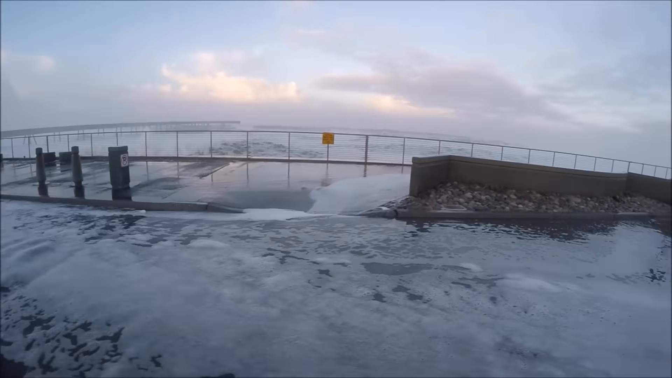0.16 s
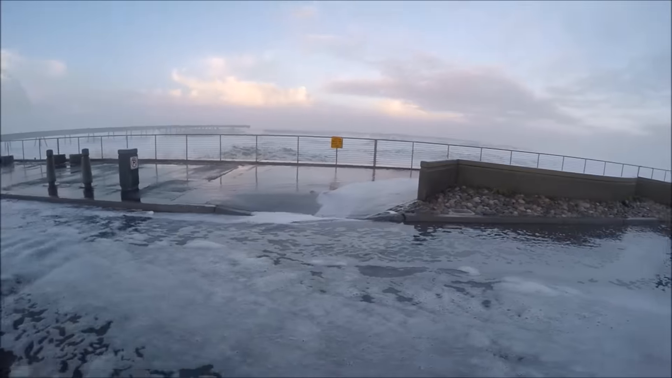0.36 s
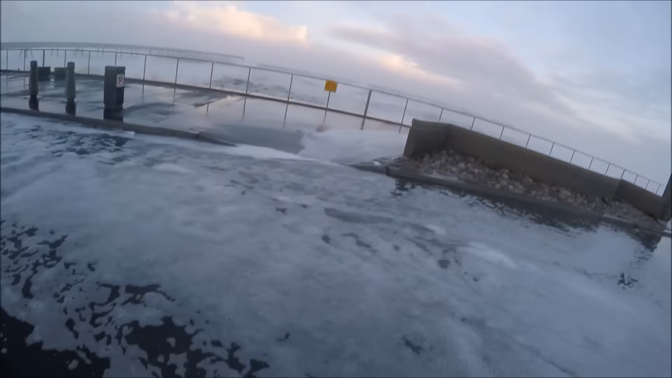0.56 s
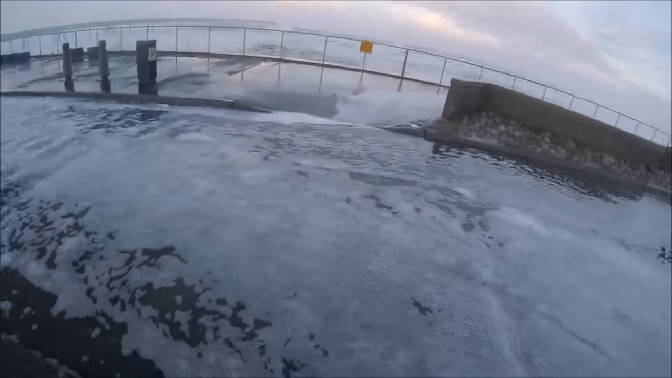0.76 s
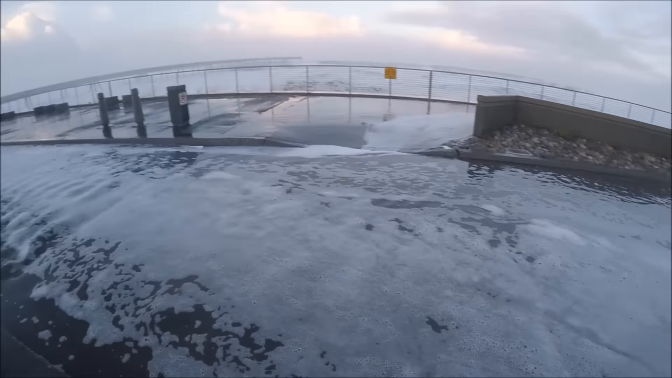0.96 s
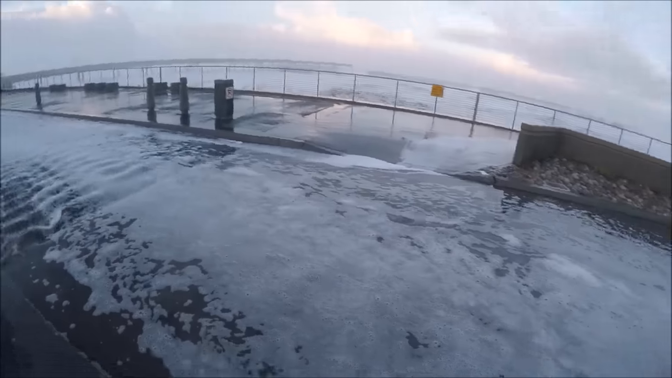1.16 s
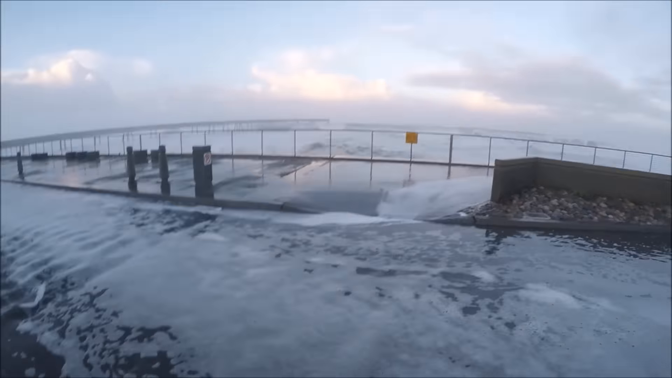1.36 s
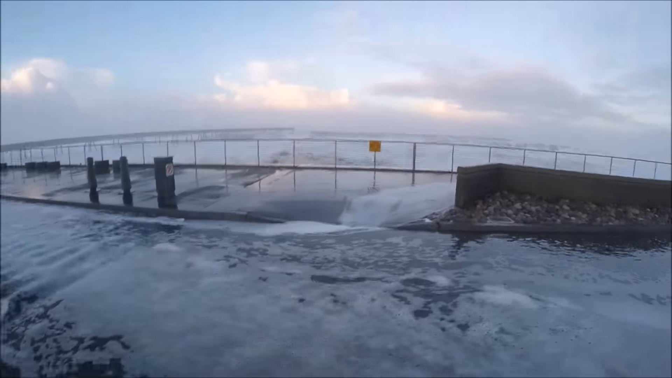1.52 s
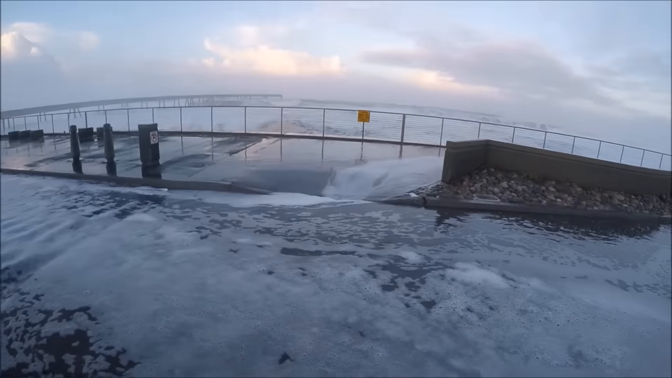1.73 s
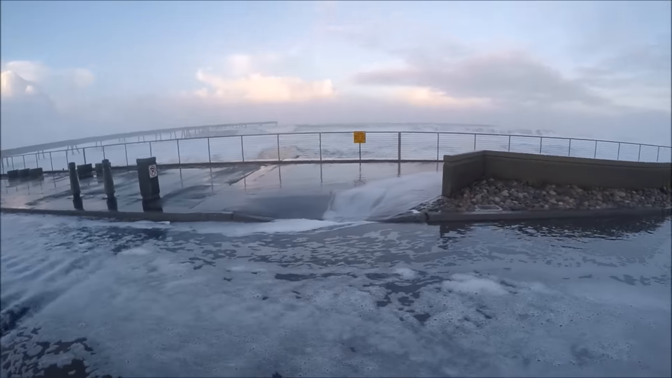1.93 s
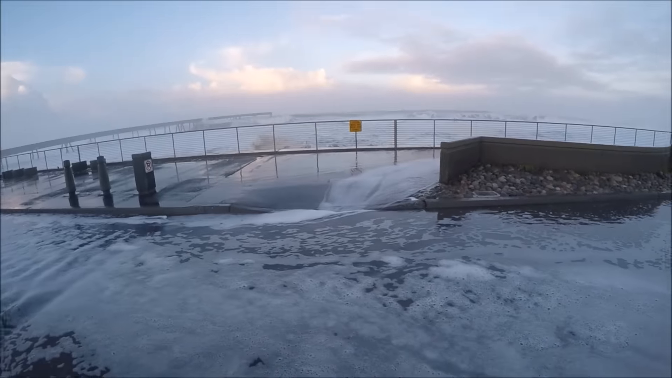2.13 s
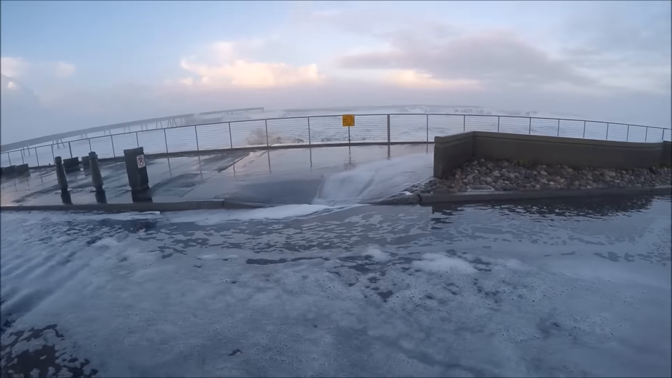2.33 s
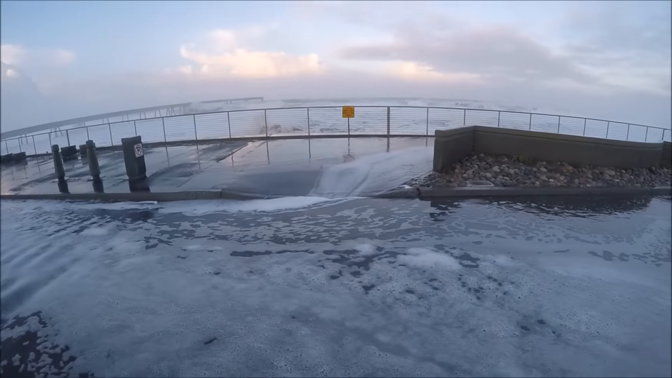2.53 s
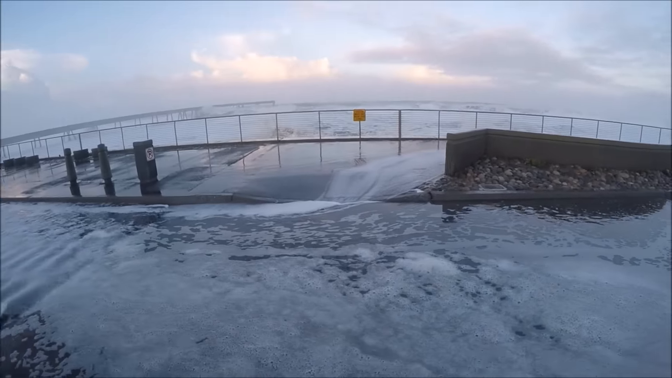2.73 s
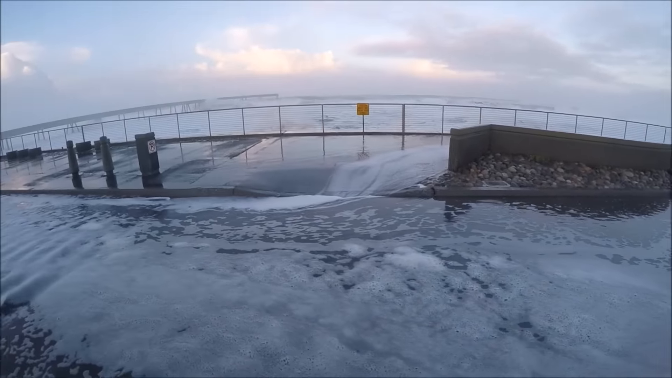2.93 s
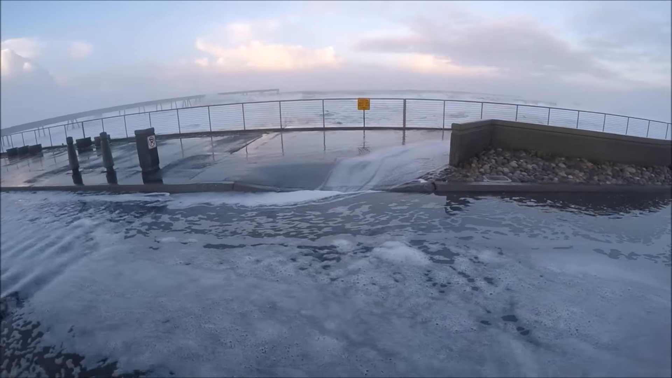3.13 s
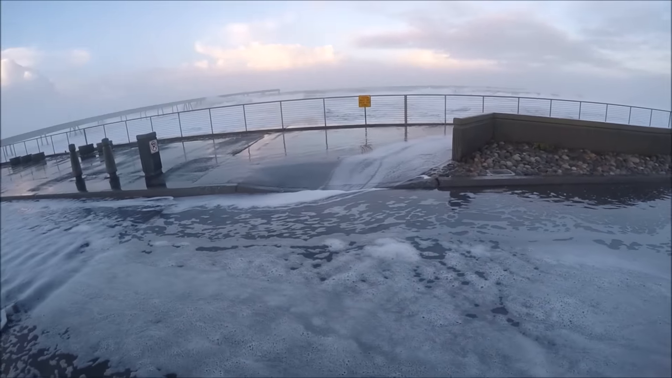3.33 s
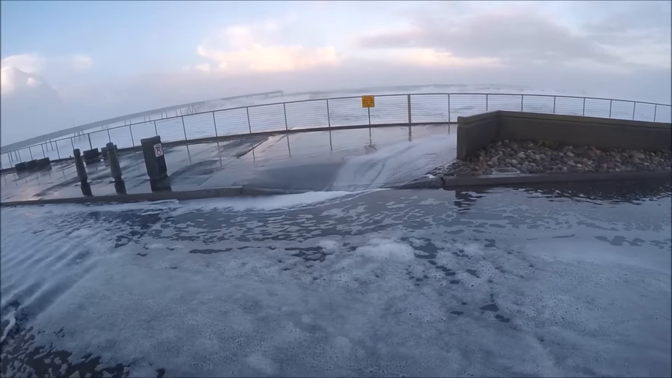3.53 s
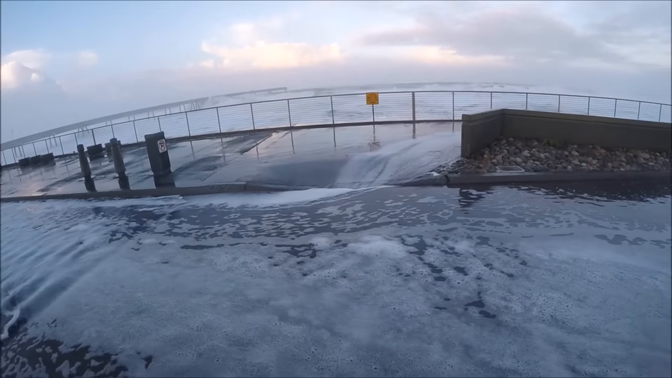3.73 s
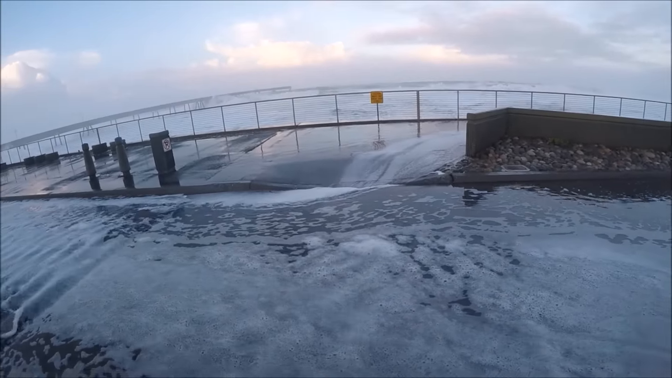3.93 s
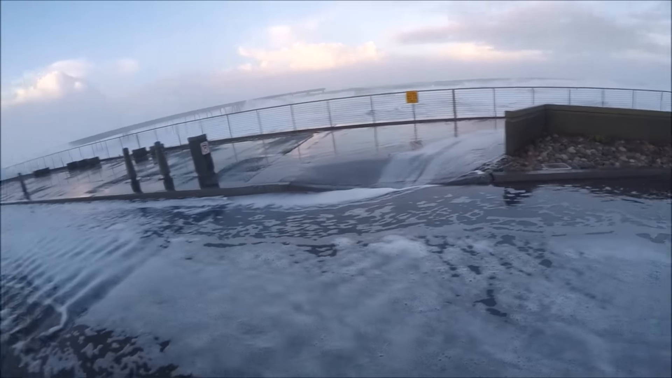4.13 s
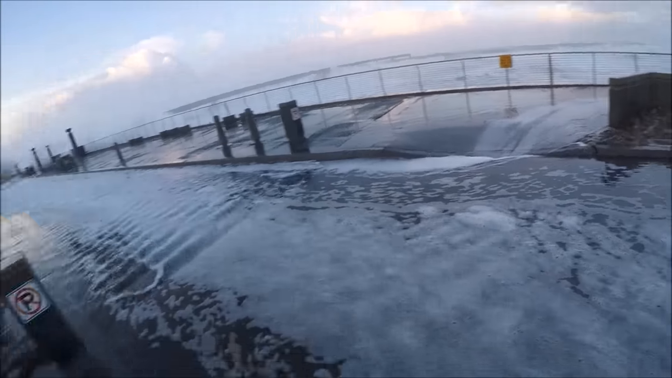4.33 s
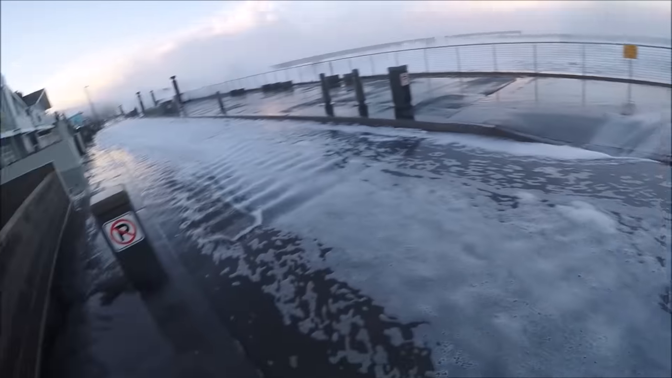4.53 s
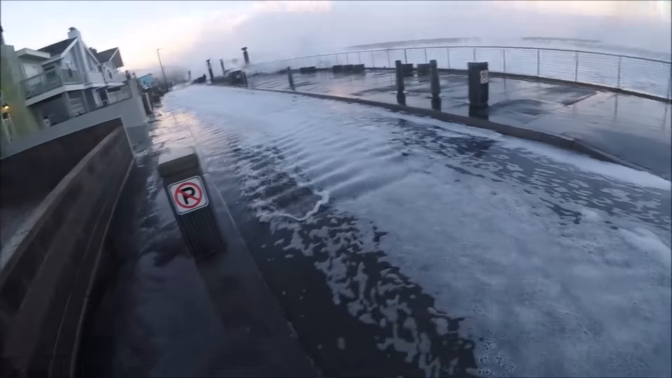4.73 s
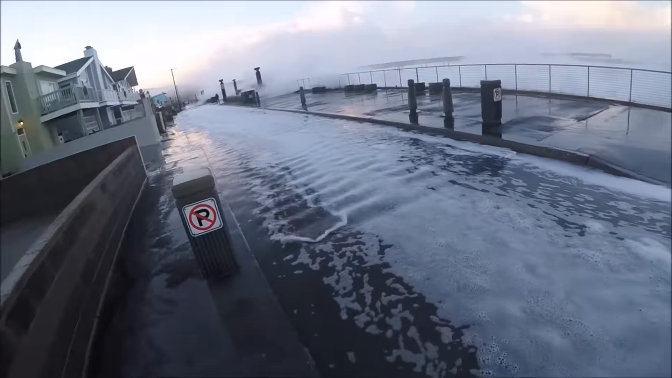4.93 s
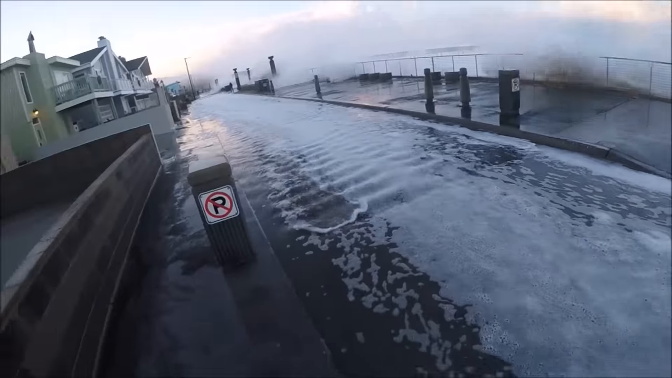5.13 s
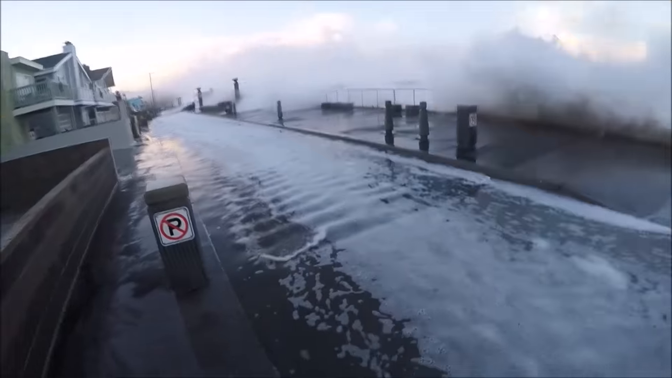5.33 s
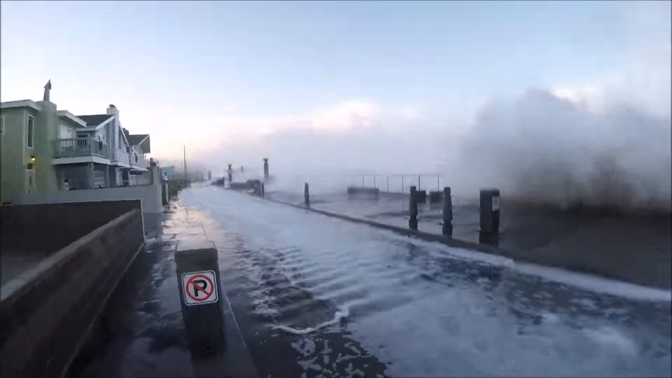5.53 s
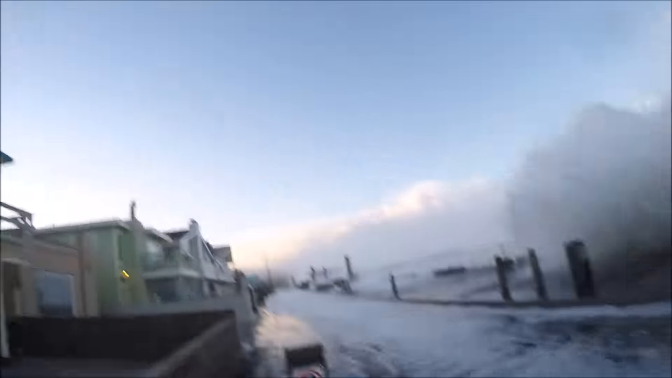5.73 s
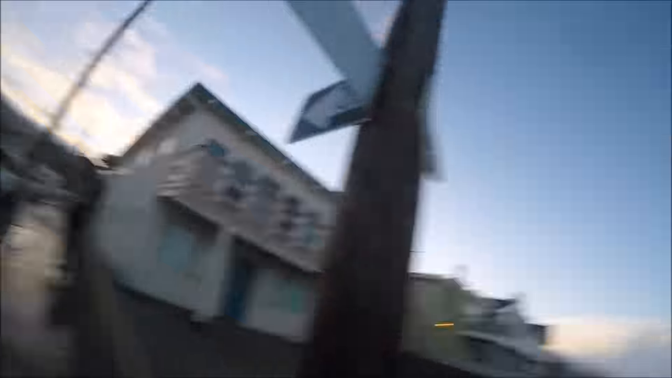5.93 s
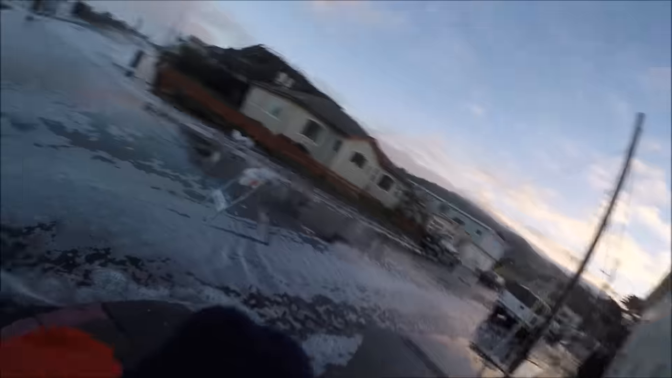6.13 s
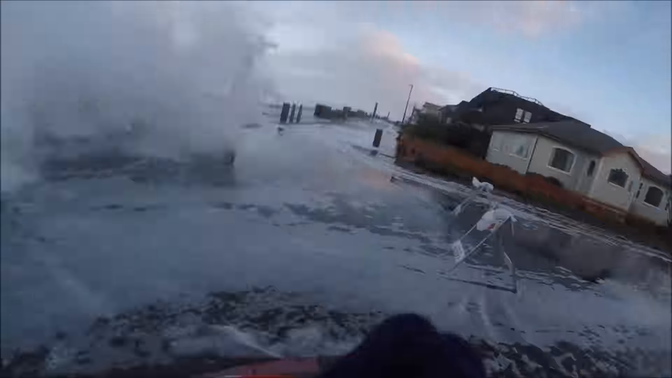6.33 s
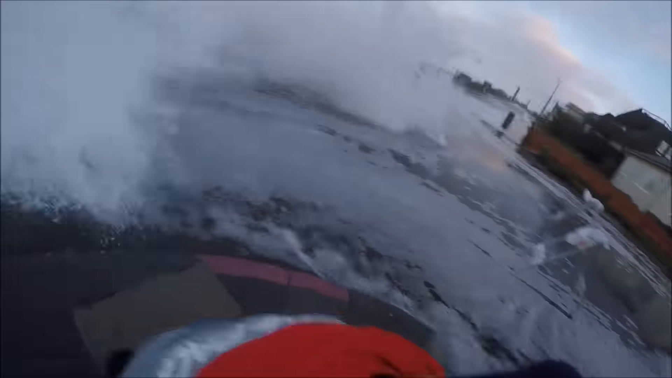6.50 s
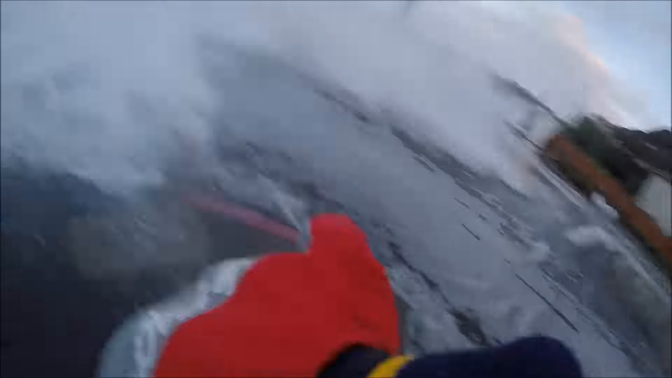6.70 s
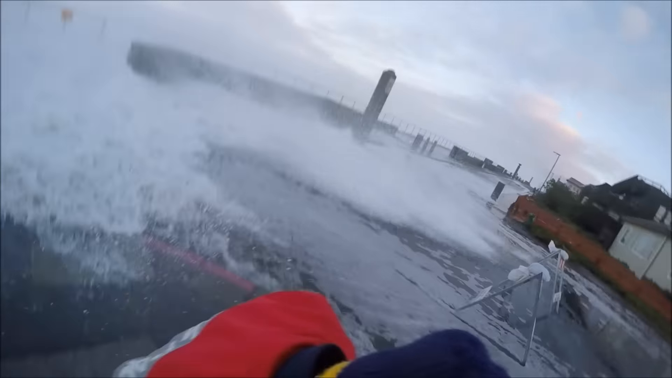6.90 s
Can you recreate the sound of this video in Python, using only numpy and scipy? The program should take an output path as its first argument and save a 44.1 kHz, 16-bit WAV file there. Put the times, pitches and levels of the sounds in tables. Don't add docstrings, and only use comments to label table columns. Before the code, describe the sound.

Gloved hands knock and rub a small plastic camera case over faint surf hiss, then thumps return as bright spray rushes in close.

```python
import sys
import numpy as np
from scipy import signal
from scipy.fft import rfft, irfft
from scipy.io import wavfile
from scipy.ndimage import uniform_filter1d

SR = 44100
rng = np.random.default_rng(int(sys.argv[2]) if len(sys.argv) > 2 else 0)


def digitize_waveform(pressure):
    field = np.atleast_2d(pressure).T
    bounded = np.clip(field, -1, 1)
    quanta = np.round(bounded * 32767).astype(np.int16)
    wavfile.write(sys.argv[1], SR, quanta)


def gain_from_db(level_db):
    decades = np.asarray(level_db, float) / 20
    return 10 ** decades


N = 306932


def rms_one(x):
    return x / np.sqrt(np.mean(x ** 2) + 1e-20)


def in_time(rows):
    s, control = np.transpose(rows)
    return np.interp(np.arange(N) / SR, s, control)


def band(x, low_hz, high_hz, order=2):
    return signal.sosfilt(signal.butter(order, [low_hz, high_hz], "band", fs=SR, output="sos"), x)


def above(hz, order):
    return signal.butter(order, hz, "high", fs=SR, output="sos")


def response(spectrum, modes, size=8192):
    hz = np.maximum(np.fft.rfftfreq(size, 1 / SR), 1)
    corner_hz, corner_db = np.transpose(spectrum)
    level_db = np.interp(np.log(hz), np.log(corner_hz), corner_db)
    for centre, width, db in modes:
        level_db = level_db + db / (1 + (2 * (hz - centre) / width) ** 2)
    cepstrum = irfft(np.log(gain_from_db(level_db)))
    cepstrum[1:size // 2] *= 2
    cepstrum[size // 2 + 1:] = 0
    return irfft(np.exp(rfft(cepstrum)))[:size // 2]


def through(x, impulse):
    return signal.fftconvolve(x, impulse)[:N]


def drift(rate_hz):
    r = np.exp(-80 * np.pi * rate_hz / SR)
    noise = rng.standard_normal(N // 40 + 2002)
    slow = signal.lfilter([1], [1, -2 * r, r * r], noise)[2000:]
    return np.interp(np.arange(N) / 40, np.arange(len(slow)), rms_one(slow))


def grains(per_s, spread_db):
    sizes = gain_from_db(spread_db * np.minimum(rng.exponential(1, N), 4)) * rng.choice([-1, 1], N)
    return sizes * (rng.random(N) < per_s / SR)


# t/s, spray level/dB
WAVE = [(0.0, -73), (4.45, -71), (4.62, -64.5), (4.67, -62.5), (5.05, -59.5), (5.08, -53), (5.2, -51.5),
        (5.28, -50), (5.31, -46.5), (5.45, -48.5), (5.6, -55.5), (5.85, -54.5), (6.04, -48.5), (6.2, -43),
        (6.33, -43), (6.6, -40), (6.8, -41.5), (6.96, -44.5)]
# f/Hz, level/dB (per Hz)
LEAK = [(410, -28), (700, -8.5), (1470, -7), (1710, -2), (2460, -3.5), (3230, -4), (3730, -18), (5500, -13),
        (7600, -26), (13100, -15), (15500, -18)]
# f/Hz, width/Hz, level/dB
CAVITY_MODES = [(1726, 190, 4), (2350, 360, 0.5), (2820, 460, 2), (3300, 360, 3), (5440, 180, 4),
                (6640, 270, 7.5), (7400, 530, 1.5), (8400, 1700, 3), (10000, 320, 4.5)]
# f/Hz, level/dB (per Hz)
ROAR = [(120, -42), (200, -3), (426, -8), (511, -10), (1200, -23), (1560, -54), (2640, -120)]
# f/Hz, level/dB (per Hz)
SPRAY = [(880, -40.5), (1500, -15.5), (2150, -6.5), (3250, -1), (3650, -5.5), (4480, -6), (8050, -23.5),
         (10200, -19.5), (15500, -29)]


def sea():
    spray_db = in_time(WAVE)
    rise_db = spray_db + 73
    surf_db = -61 + 0.64 * rise_db
    roar_db = -62.5 + 0.45 * rise_db

    surf = through(rng.standard_normal(N), response(LEAK, CAVITY_MODES))
    surf = surf / np.std(band(surf, 2900, 3500))
    surf = signal.sosfilt(signal.butter(2, 9000, fs=SR, output="sos"), surf)
    roar = rms_one(through(rng.standard_normal(N), response(ROAR, [])))

    fizz = grains(3000 * gain_from_db(2.2 * drift(6)), spread_db=4.5)
    bubbles = rms_one(fizz) + 2.0 * rng.standard_normal(N)
    spray = through(bubbles, response(SPRAY, CAVITY_MODES + [(7320, 820, 4.9)]))
    top = signal.sosfiltfilt(above(10800, 3), spray)
    spray = spray + top * (gain_from_db(0.9 * np.clip(spray_db + 43, -16, 4)) - 1)
    spray = spray / np.std(band(spray, 7000, 12000))

    surges, swell = gain_from_db(0.8 * drift(12)), gain_from_db(1.2 * drift(6))
    far_surf = gain_from_db(surf_db - 5.0 + 1.9 * drift(5.1)) * surf
    return far_surf + gain_from_db(spray_db - 3.0) * surges * spray + gain_from_db(roar_db) * swell * roar


# t/s, level/dB
WIND = [(0.0, -32), (0.24, -40.5), (0.7, -24.5), (0.85, -37), (1.63, -33.5), (1.75, -36), (2.5, -46.5),
        (3.65, -44.5), (4.2, -37), (4.42, -39.5), (4.8, -34.5), (5.18, -39), (5.6, -19.5), (5.76, -32.5),
        (5.99, -16.5), (6.3, -22.5), (6.8, -15.5), (6.96, -22.5)]
# f/Hz, level/dB (per Hz)
GUST = [(8.8, -35), (15, 2), (49, -9), (68, -4.5), (97, -24), (133, -17), (171, -24), (260, -36),
        (340, -61), (570, -120)]
# calm level/dB, share of the gust swing, hand shaking relative to the stroke level/dB
WIND_LAYERS = [
    (-43, 1, -16),
    (-45.5, 0.647, -1.5),
    (-56, 0.41, -6.5),
]


def wind(stroke_db):
    air = through(rng.standard_normal(N), response(GUST, [], size=32768))
    gust_db = in_time(WIND) + 45
    shaking = np.abs(uniform_filter1d(gain_from_db(stroke_db) ** 2, round(0.05 * SR)))
    out = np.zeros(N)
    lows_hz, highs_hz, lumps_db = (12, 45, 100), (45, 100, 240), (0.6, 2.5, 2.2)
    for (calm_db, share, hand_db), low, high, lumps in zip(WIND_LAYERS, lows_hz, highs_hz, lumps_db):
        swing = band(air, low, high, order=3)
        even = swing / np.sqrt(uniform_filter1d(swing ** 2, size=4410) + 0.073 * np.mean(swing ** 2))
        level = np.sqrt(gain_from_db(calm_db + share * gust_db) ** 2 + gain_from_db(hand_db) ** 2 * shaking)
        out += level * gain_from_db(lumps * drift(8.4)) * rms_one(even)
    return out


# f/Hz, level/dB (per Hz)
SHELL = [(150, -54), (260, -27), (430, -17), (560, -10), (1000, -12), (1500, -13.5), (2300, -3),
         (3000, -9.5), (4500, -17.5), (6200, -32.5), (9000, -35.5), (15500, -36)]
# f/Hz, width/Hz, level/dB
SHELL_MODES = [(619.5, 115, 7.5), (1200, 650, 12), (1690, 88, 2.5), (2144, 100, 6.5), (2516, 220, 10),
               (3490, 61, 11), (4010, 200, -4), (4343, 410, 12.5), (5000, 310, -19.5), (5310, 1900, 20),
               (7130, 900, 12.5), (8060, 180, -12), (8200, 380, 8), (10600, 2700, 10.5)]


def shell_bands():
    wall = response(SHELL, SHELL_MODES)
    edges_hz = (150, 1600, 3200, 18000)
    return [band(band(wall, low, high), low, high) for low, high in zip(edges_hz, edges_hz[1:])]


# t/s, peak level/dB, middle part/dB, bright part/dB (both relative), 60 dB fade/s
KNOCKS = [(0.001, -38, -8, -2.5, 0.026), (0.262, -17.5, 9, -9, 0.049), (0.374, -23, 17.5, -3, 0.079),
          (0.441, -24, -19, -11, 0.076), (0.498, -5.5, -2, -16, 0.027), (0.563, -6, 7, 1.5, 0.031),
          (0.588, -6, -15, -1, 0.021), (0.748, -20, 5, -23, 0.028), (1.097, -1.5, -3, -13, 0.015),
          (1.114, -20.5, -21, 6.5, 0.028), (1.428, -11.5, -5, -8.5, 0.018), (1.574, -41, -10, -21, 0.027),
          (1.816, -28.5, 1, -9.5, 0.031), (1.835, -19, -16, -26, 0.016), (2.554, -54, 12, 12, 0.03),
          (4.327, -33, 0, -16, 0.029), (4.784, -39.5, -17, 0, 0.038), (5.517, -28, -12, -18, 0.1),
          (5.984, -20.5, -1, -9, 0.1), (6.218, -9.5, -25, -9, 0.071), (6.497, -23.5, -13, -13, 0.1)]


def knocks(parts):
    out, t = np.zeros(N), np.arange(4096) / SR
    rattles = rng.standard_normal((len(KNOCKS), len(t)))
    for (s, db, middle_db, bright_db, t60), rattle in zip(KNOCKS, rattles):
        blow = 0.17 * rattle * gain_from_db(-60 * t / max(t60, 0.003))
        blow[0] = 2.07
        blow = signal.lfilter([1], [1, -0.6], blow)
        sound = np.zeros(len(t))
        for part, shift_db in zip(parts, (0, middle_db, bright_db)):
            rung = signal.fftconvolve(blow, part)[:len(t)]
            sound += gain_from_db(db + shift_db) * rung / np.abs(rung).max()
        i = round(s * SR)
        out[i:i + len(t)] += sound[:N - i]
    return out


# t/s, peak level/dB, sway f/Hz, 60 dB fade/s, upper mode/dB (relative)
JOLTS = [(0.261, -4.5, 70.4, 0.19, 6.5), (0.275, -2, 63, 0.095, -19), (0.385, -5.5, 55.6, 0.046, -9),
         (0.444, 1.5, 64, 0.076, -6.5), (0.566, -9.5, 66.4, 0.37, 3.5), (0.582, -7, 65.1, 0.134, -30),
         (0.598, -9.5, 62.2, 0.37, -34), (0.675, -4, 58.5, 0.12, -16), (1.1, -10.5, 57.8, 0.41, -3),
         (1.154, -10.5, 70, 0.23, 11), (1.624, -14.5, 54.5, 0.12, -26), (1.43, -27, 60.4, 0.089, 3),
         (1.84, -24.5, 59.6, 0.14, 2.5)]
FLIGHT_JOLTS = [
    (5.545, -10.5, 48, 0.28, -10.5),
    (5.608, -11.5, 43.1, 0.068, 0),
    (5.795, -15, 54.2, 0.35, -15.5),
    (5.981, -2, 43, 0.092, -14),
    (6.185, 5.5, 43.7, 0.077, -17),
    (6.38, -15, 43.1, 0.075, -29),
    (6.499, -18.5, 43.1, 0.07, 5.5),
    (6.754, -8, 42.5, 0.08, -5.5),
]
JOLT_SIDES = [1, 1, 1, 1, 1, 1, 1, -1, 1, 1, -1, 1, 1, -1, 1, -1, 1, -1, 1, 1, -1]


def jolts():
    out, t = np.zeros(N), np.arange(SR // 3) / SR
    for (s, db, hz, t60, upper_db), side in zip(JOLTS + FLIGHT_JOLTS, JOLT_SIDES):
        sway = np.sin(2 * np.pi * hz * t) * gain_from_db(-60 * t / max(t60, 0.02))
        shake = np.sin(2 * np.pi * 154.7 * t) * gain_from_db(upper_db - 60 * t / 0.087)
        i = round(s * SR)
        out[i:i + len(t)] += (side * gain_from_db(db) * (sway - shake))[:N - i]
    soft = np.hanning(round(0.006 * SR))
    return through(out, soft / soft.sum())


# t/s, length/s, level/dB, swell
# over the stroke/dB, firmness/dB
STROKES = [(0.272, 0.072, -30.5, -2, 11), (0.356, 0.018, -33, 9, 3.5), (0.389, 0.023, -39, -4, 4),
           (0.442, 0.026, -37.5, -2, 0.5), (0.474, 0.026, -40.5, 8.5, 12.5), (0.491, 0.057, -31.5, -2.5, 6),
           (0.559, 0.063, -24.5, -9.5, 8), (0.63, 0.057, -36, -3, 4.5), (0.685, 0.048, -27, 3, -0.5),
           (0.758, 0.15, -32.5, -5, 4), (0.883, 0.058, -34, 8, -0.5), (0.943, .06, -25.5, -9, 3),
           (1.008, 0.077, -37, 11.5, -3.5), (1.09, 0.058, -28, -3, 4), (1.132, 0.099, -30.5, 2.5, 1.5),
           (1.263, .085, -55.5, 2, 1), (1.362, 0.06, -50, 13.5, 1), (1.431, .055, -38.5, 6.5, -1.5),
           (1.492, 0.072, -32.5, -20, -1.5), (1.576, 0.034, -33.5, -2.5, 0), (1.629, 0.07, -36, 0, -1),
           (1.697, 0.071, -40.5, -10.5, -2.5), (1.771, 0.093, -47.5, 0, -2.5), (1.866, .17, -59.5, -2, 0.5),
           (5.502, 0.047, -52.5, 12, 3), (5.597, 0.028, -36.5, 5, -1),
                  (5.674, 0.023, -37.5, 0.5, 0.5), (5.763, .05, -39.5, -8.5, -3),
                  (5.815, 0.065, -47.5, 7, -4), (5.95, .05, -51, 7, -4), (6.039, 0.036, -35.5, -6.5, -3),
                  (6.091, 0.08, -40, 19, -1.5), (6.173, 0.059, -25, 2, 5.5), (6.233, .07, -30, 3, 8),
                  (6.337, 0.053, -32.5, -2, -2.5), (6.376, 0.07, -31.5, 1.5, 7),
                  (6.481, 0.049, -32.5, -8, 0), (6.503, 0.054, -39.5, -1, 5), (6.61, 0.087, -51, 10.5, -9),
                  (6.716, 0.04, -35.5, 1, -1), (6.791, 0.047, -44, 3, 4), (6.909, 0.034, -40.5, 9.5, 0)]


def hand():
    start, length, db, swell_db, firm = np.transpose(STROKES)[:, :, None]
    touch_db_per_s, lift_db_per_s = 1492, 815
    t = np.arange(0, N, 20) / SR - start
    level = db + swell_db * np.clip(t / length, 0, 1)
    level = level + touch_db_per_s * gain_from_db(firm) * np.minimum(t, 0)
    level = level - lift_db_per_s * np.maximum(t - length, 0)
    tracks = [np.maximum(level.max(axis=0), -120), firm[level.argmax(axis=0), 0]]
    return uniform_filter1d(np.repeat(tracks, repeats=20, axis=1)[:, :N], size=100)


def grip(slips, free_hz, free_db, width_hz, patchy_db):
    hz, s, frames = signal.stft(slips, SR, nperseg=256)
    patches = rng.standard_normal(frames.shape)
    patches = uniform_filter1d(patches, size=3, axis=0)
    patches = rms_one(uniform_filter1d(patches, size=18, axis=1))
    free = np.interp(s, np.arange(N) / SR, free_hz)
    lift_db = free_db / (1 + (2 * (hz[:, None] - free) / width_hz) ** 2)
    return signal.istft(frames * gain_from_db(lift_db + patchy_db * patches), SR, nperseg=256)[1][:N]


def glove(parts, stroke_db, firm):
    slips = rms_one(grains(6000, spread_db=2.0)) + 0.5 * rms_one(grains(400, spread_db=3.5))
    slips = slips * gain_from_db(0.24 * drift(68))
    free_hz = np.minimum(1816 + 76 * firm, 1920)
    slips = grip(slips, free_hz, free_db=7.0, width_hz=400, patchy_db=3.0)
    firm = uniform_filter1d(firm, round(0.026 * SR))
    bright_db = np.where(np.arange(N) < 4 * SR, -8, -14.5)
    bright_db = bright_db + 0.97 * firm + 0.28 * (stroke_db + 31)
    out = np.zeros(N)
    for part, shift_db in zip(parts, (0, firm, bright_db)):
        out += gain_from_db(stroke_db + shift_db + 1.8 * drift(20)) * rms_one(through(slips, part))
    return out


def scene():
    parts = shell_bands()
    stroke_db, firm = hand()
    return (sea() + wind(stroke_db) + knocks(parts) + jolts() + glove(parts, stroke_db, firm))[None]


# t/s, lost above f/Hz
DROPOUTS = [(3.921, 5000), (4.0, 4150), (4.05, 5000), (4.43, 6500), (5.732, 6050), (5.773, 6400),
            (6.585, 8200)]


def drop_treble(sound):
    fade = np.clip(3 - np.abs(np.arange(-2048, 2048) / SR) / 0.004, 0, 1)
    for s, above_hz in DROPOUTS:
        near = slice(round(s * SR) - 2048, round(s * SR) + 2048)
        top = signal.sosfiltfilt(above(above_hz, 8), sound[:, near])
        sound[:, near] -= 0.88 * top * fade
    return sound


def low_pass(x):
    return signal.sosfilt(signal.butter(12, 15700, fs=SR, output="sos"), x)


def record(dry):
    hiss = gain_from_db(-78) * signal.lfilter([1, -1], [1], rng.standard_normal(dry.shape))
    sound = signal.sosfilt(above(6, 1), dry + hiss)
    sound = sound / (1 + (sound / 0.92) ** 4) ** 0.25
    sound = drop_treble(sound)
    sound = signal.sosfilt(signal.ellip(12, 0.5, 70, 15350, fs=SR, output="sos"), sound)
    return low_pass(sound)


dry = scene()
out = record(dry)
digitize_waveform(out)
```